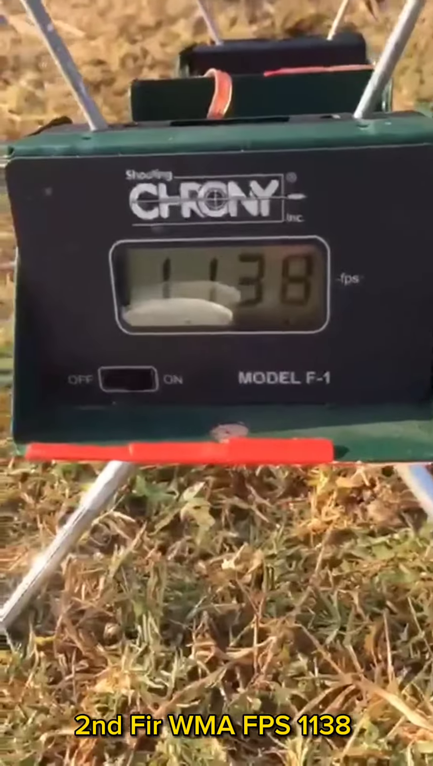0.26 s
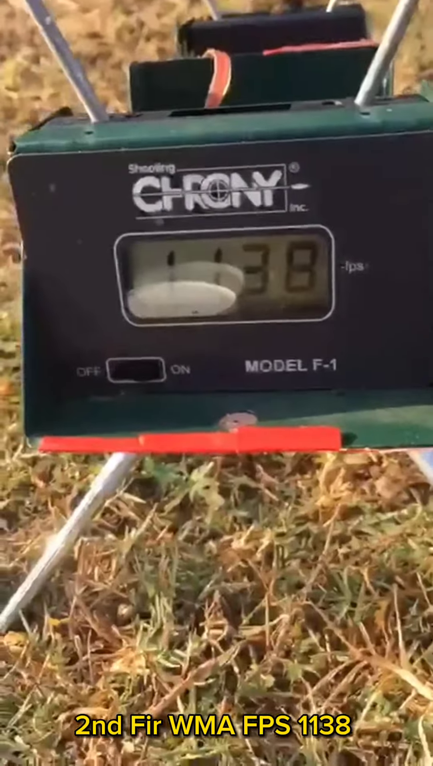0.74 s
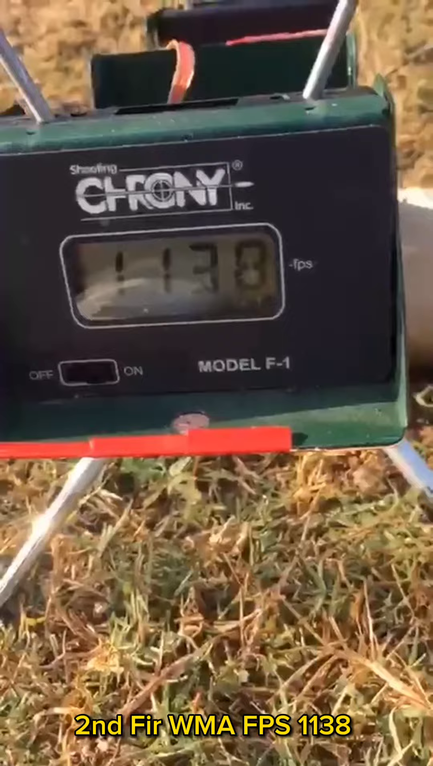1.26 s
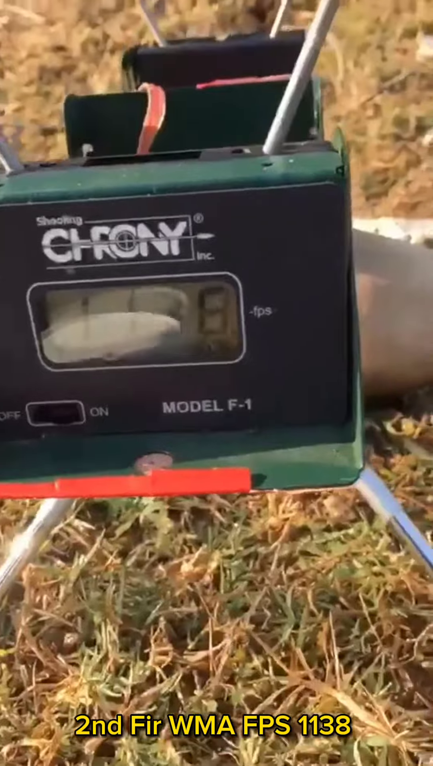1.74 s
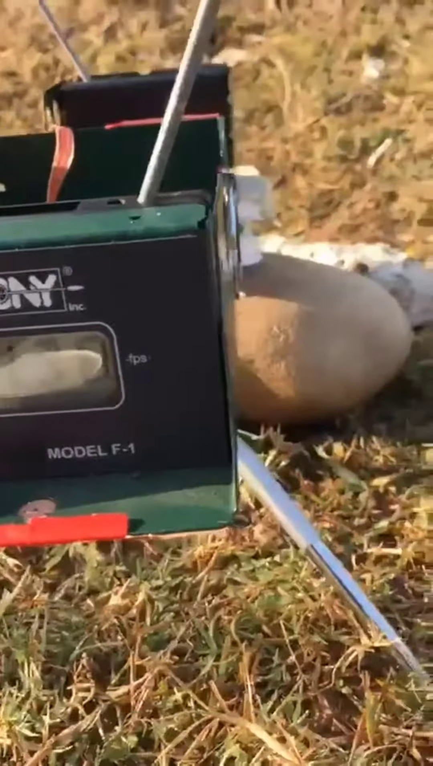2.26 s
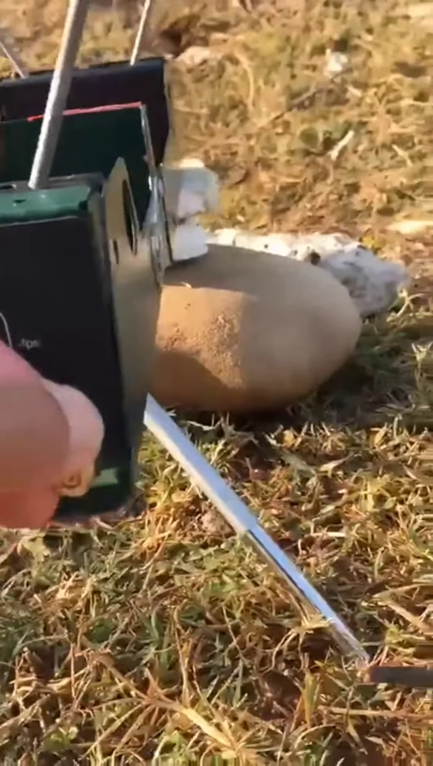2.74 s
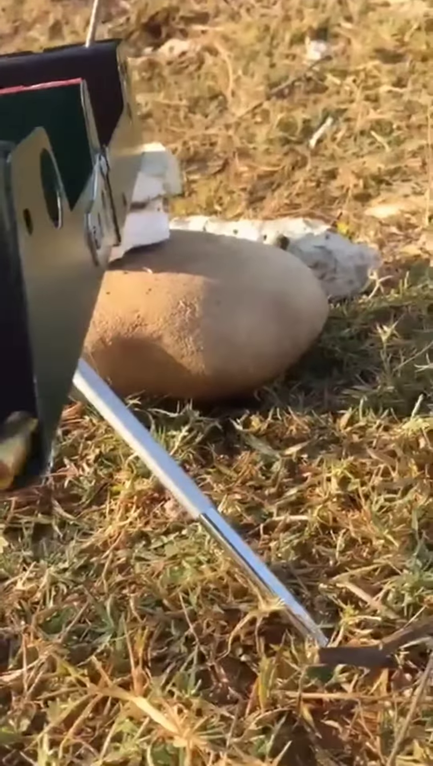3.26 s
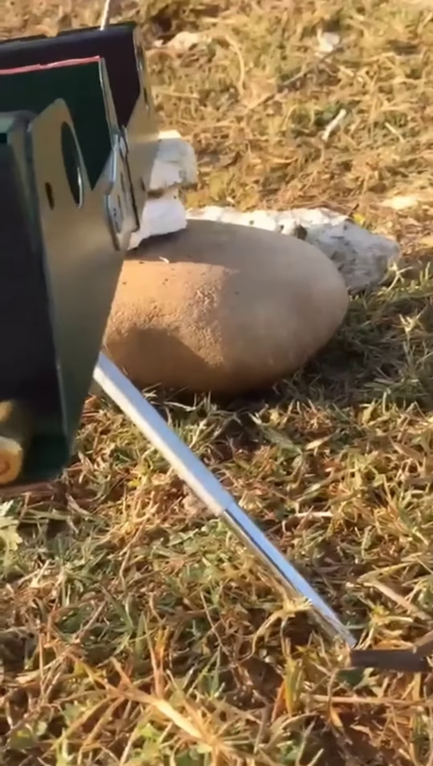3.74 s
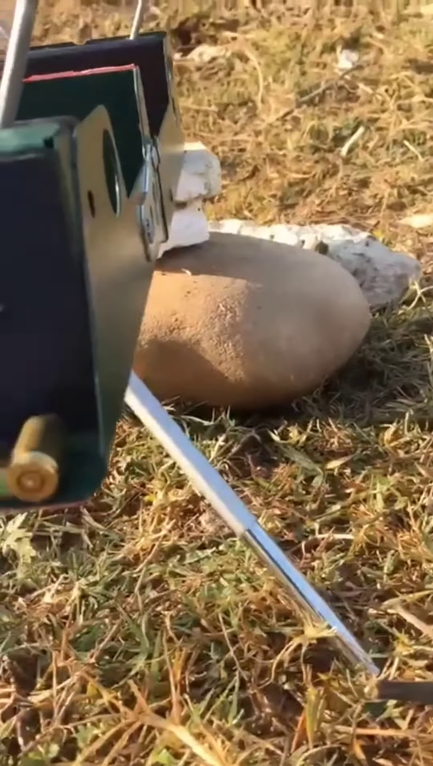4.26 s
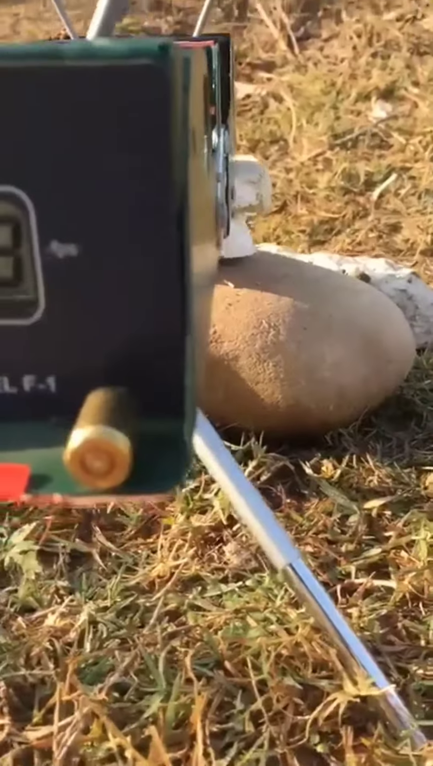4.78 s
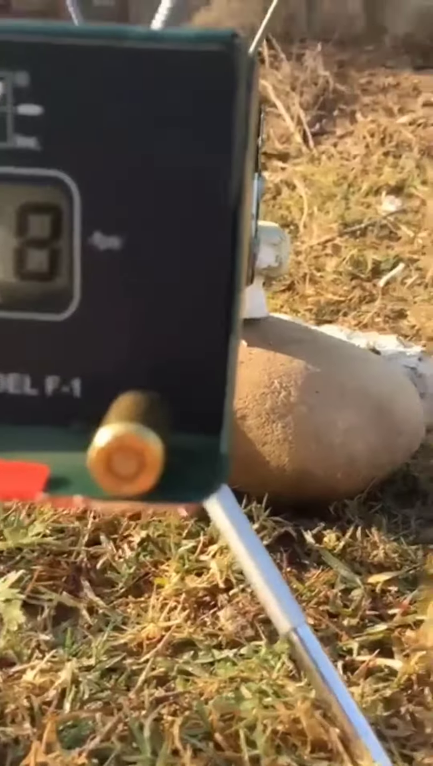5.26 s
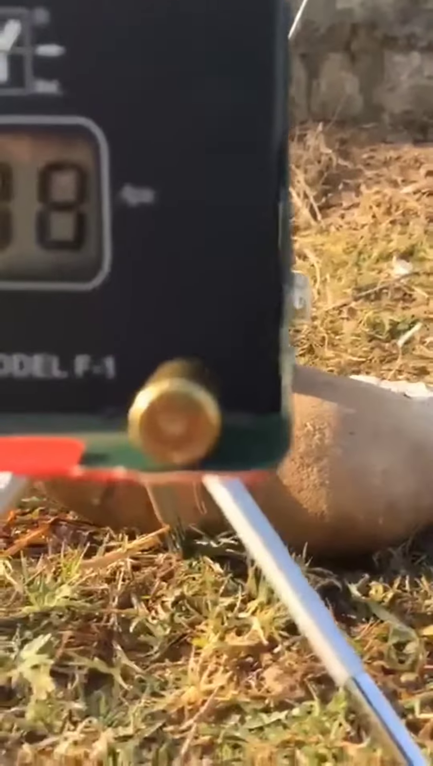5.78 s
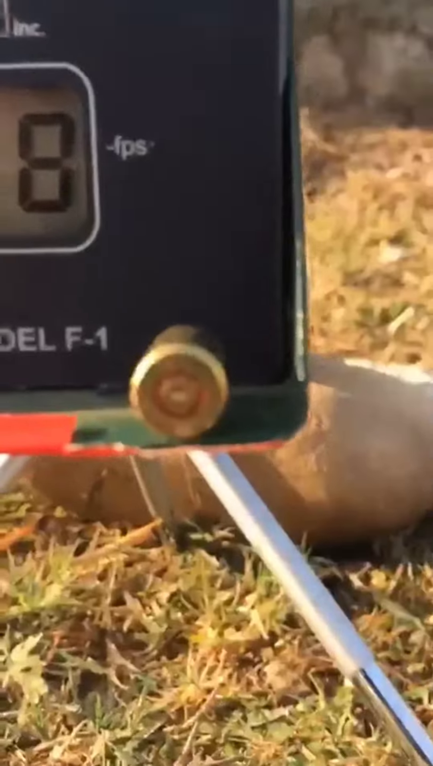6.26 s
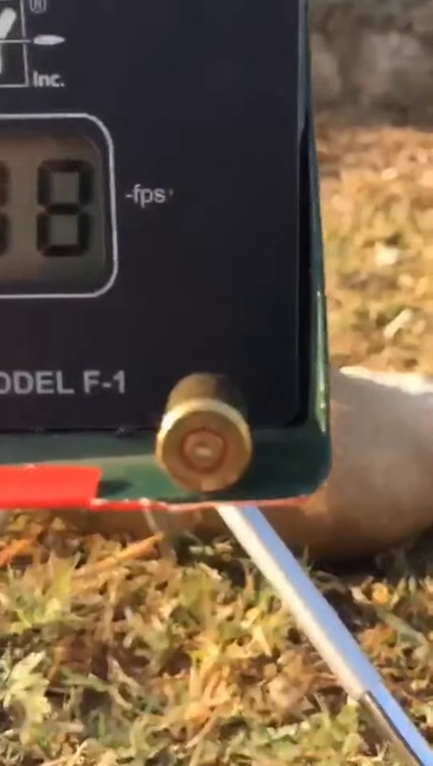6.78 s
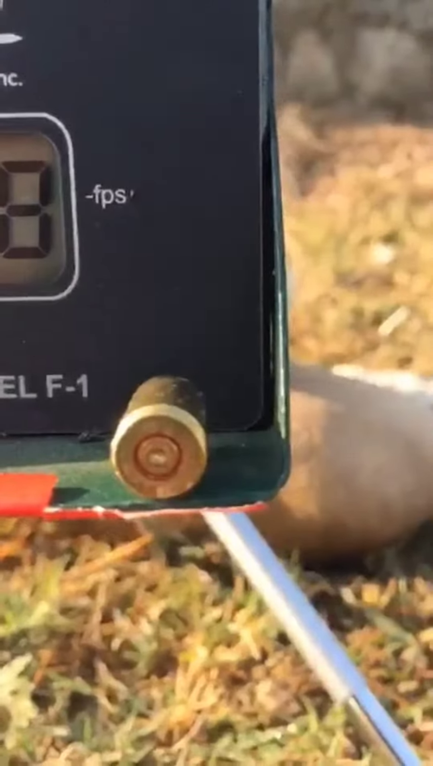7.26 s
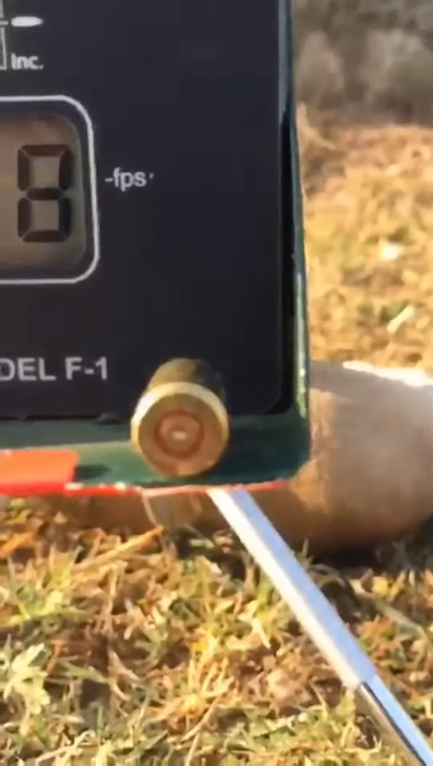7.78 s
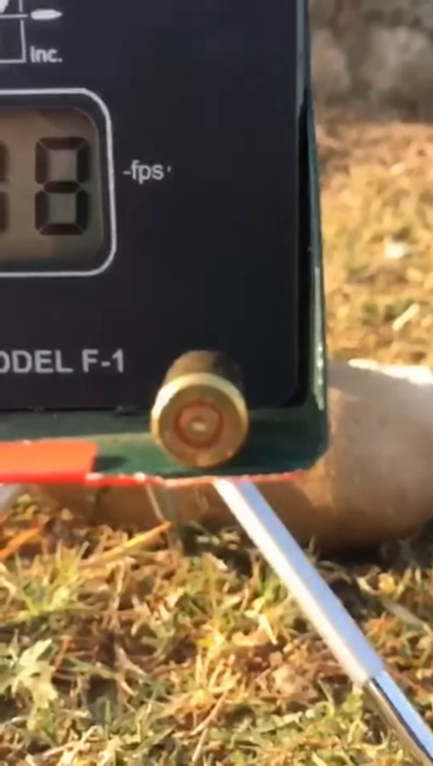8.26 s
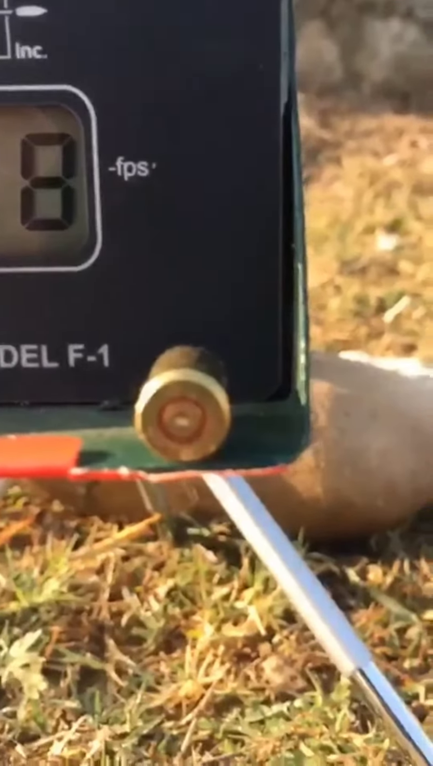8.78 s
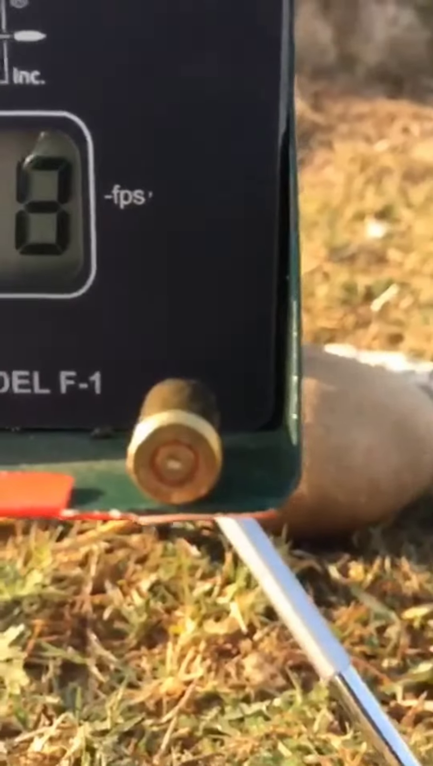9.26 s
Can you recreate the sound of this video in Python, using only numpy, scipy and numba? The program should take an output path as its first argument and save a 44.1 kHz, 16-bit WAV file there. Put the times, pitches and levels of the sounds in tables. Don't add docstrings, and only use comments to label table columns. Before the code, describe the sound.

A handheld phone microphone in an open field picks up quiet far traffic rumble and thin air hiss throughout. From 0 s crows caw near and far in short, nasal, rattling calls of roughly a third of a second, one of them hoarser; a soft finger knock opens the scene, and tiny high songbird whistles flicker until about 6 s. A bright metallic tap with a quick rebound lands near 1 s, a thin fingernail tick on brass at 1.3 s. At 2.8 to 2.9 s a brass shell hits a sheet-metal case, the second blow the loudest event, ringing briefly, with bounces at 3.3 s. Lighter taps follow near 4 s; soft knocks and a faint dry-grass brush come around 5.2 s. From 6.2 s a higher, clearer crow and answering neighbours overlap densely. A short tap and dull knocks arrive at 9 s as the cawing continues.

```python
import sys
import numpy as np
from scipy import signal
from scipy.fft import rfft, irfft
from scipy.io import wavfile
from scipy.ndimage import uniform_filter1d
from numba import njit

SR = 44100
rng = np.random.default_rng(int(sys.argv[2]) if len(sys.argv) > 2 else 0)


def elevation(decibels):
    levels = np.asarray(decibels, float)
    return 10 ** (levels / 20)


def to_wav(sig):
    pcm = np.clip(np.atleast_2d(sig), -1, 1) * 32767
    pcm = np.round(pcm).astype(np.int16)
    wavfile.write(sys.argv[1], SR, pcm.T)


N = 420273

# frequency in Hz, density in dB per Hz.
FIELD_SPECTRUM = [(24, -45.5), (40, 4), (149, -4), (461, -27), (600, -31), (800, -30.5), (1200, -40.5),
                  (2500, -42), (2900, -47), (4720, -49), (5580, -53), (11200, -59), (12300, -79),
                  (16000, -103), (22000, -120)]
# start in seconds, length in seconds, first and last pitch in Hz, level in dB.
WHISTLES = [(.062, .028, 4350, 4900, -64), (1.332, .011, 6500, 6500, -65), (1.374, .027, 4450, 4850, -68),
            (1.401, .014, 3800, 3700, -70), (2.325, .025, 4450, 4900, -65), (2.35, .03, 6100, 6150, -66),
            (3.046, .03, 4550, 4500, -67), (4.108, .055, 3620, 5000, -63), (4.157, .032, 5000, 4680, -60),
            (4.908, .034, 4050, 4900, -61), (4.941, .02, 5960, 5950, -59), (5.105, .018, 6450, 6450, -68),
            (5.64, .112, 3330, 3680, -75), (5.746, .056, 3680, 5050, -68), (5.797, .017, 5900, 5900, -72),
            (5.868, .024, 6350, 6450, -64), (5.884, .018, 5900, 5550, -62), (5.95, .03, 6400, 5600, -65)]
# start in
# seconds, peak in dB, centre in Hz, 60 dB decay in seconds.
KNOCKS = [(.006, -34.5, 1390, 0.051), (1.251, -46.5, 554, 0.052), (1.954, -47, 560, 0.075),
          (2.59, -43, 604, 0.055), (2.888, -50, 1783, .15), (.062, -48, 3040, 0.19),
          (4.806, -42.5, 540, 0.13), (5.134, -36.5, 990, 0.031), (5.372, -43, 1850, 0.29),
          (5.841, -41.5, 590, 0.045), (5.839, -49.5, 1040, 0.072), (6.389, -41.5, 654, 0.045),
          (9.003, -34, 570, 0.0056), (9.041, -34.5, 590, 0.023)]
# start in seconds, peak in dB, tilt in dB per octave,
# 60 dB decay of the crack in seconds, ring of the case in dB.
CASE_TAPS = [
    (0.9612, -15, -5, 0.007, -22),
    (0.9665, -20, -4, 0.007, -28),
    (3.806, -43, -11, .015, -30),
    (3.9617, -24, -4, 0.016, -20),
    (4.01, -36, -12, 0.05, -28),
    (5.134, -39, -13, .02, -30),
    (5.371, -40, -10, .018, -30),
    (9.0029, -22, -2, 0.006, -40),
]
SHELL_TAPS = [
    (2.8356, -18.5, -3, 0.034, -22),
    (2.9243, -3, 1, 0.034, -15),
    (3.3012, -22, -2, 0.026, -30),
    (3.337, -16, -3, 0.026, -30),
]
# frequency in Hz, density in dB per Hz.
CRACK_SPECTRUM = [(240, -52), (400, -39), (2230, -1), (3290, -16), (3960, -12.5), (6740, -15),
                  (7240, -21.5), (8720, -18.5), (12300, -23.5), (16000, -70), (22000, -120)]
# frequency in Hz, level in dB, 60 dB decay in seconds.
CASE_MODES = [(680, -12, .04), (1385, 0, .085), (2220, -2, .07), (2275, -23, .3), (2888, -25, .3),
              (3095, -25, .22), (3476, -24, .3), (3623, -27, .22), (3810, -27, .22), (4463, -22, .08),
              (6826, -30, .15)]
# frequency in Hz, level in dB, 60 dB decay in seconds.
BRASS_MODES = [(7630, -28, .1), (8545, -12, .11), (9600, -25, .06), (11080, -33, .25), (11640, -11, .16)]
# frequency in Hz, gain in dB.
THROAT = [(450, -50.5), (965, 2.5), (1400, -5), (1900, 4), (2400, -21), (2800, -20.5), (3600, -40.5),
          (12000, -56.5)]
# frequency in Hz, width in Hz, level in dB.
PIPE = [(3200, 1100, -7.5), (3913, 370, 1), (4265, 260, -1.5), (5450, 260, -5), (5845, 270, -0.5),
        (6760, 280, -8), (8110, 800, -15)]
# start in seconds, length in seconds, top pitch in Hz, level in dB,
# spread in dB of the partials around the 4th.
FAR_CROWS = [(.11, 0.27, 451.4, -49.5, 5), (.55, 0.33, 462.5, -50, 3), (1.39, 0.27, 468, -51.5, 9.5),
             (1.62, 0.19, 486, -44, -24), (2.52, 0.17, 474, -52, 9), (3.5, 0.28, 478, -53, 0),
             (4.06, 0.22, 463.5, -54.5, -0.5), (4.2, 0.4, 489, -46.5, 16.5), (4.64, 0.31, 498, -67.5, -4),
             (1.86, 0.23, 505, -74, -14), (0.0, 0.14, 482, -57, 8.5)]
STEADY_CROW = [(.3, 0.32, 454.5, -40.5, -6), (.76, 0.34, 466, -40, 4), (.815, 0.16, 460, -39, -25),
               (2.1, 0.255, 468.6, -32, 0), (2.58, 0.31, 461, -39, 4), (3.3, 0.26, 445.5, -39.5, 4),
               (3.81, 0.26, 450, -38.5, 3), (4.32, 0.3, 439, -41, -5), (4.825, 0.33, 453, -42, -4),
               (5.38, 0.27, 454, -42, 2.5), (5.93, 0.26, 464.7, -43.5, 6.5)]
ANSWERING_CROWS = [(6.45, 0.28, 466, -47, 6.5), (6.68, 0.3, 486.5, -40, 10), (7.08, 0.18, 454, -31.5, 0.5),
                   (7.2, 0.15, 430.4, -33.5, -4.5), (7.42, 0.31, 454.5, -35, -7),
                   (7.62, 0.24, 443, -34, -3.5), (7.95, .415, 465, -39.5, 9), (8.46, .25, 469.5, -38.5, -2),
                   (8.55, 0.29, 453.5, -45.5, -0.5), (9.08, 0.19, 449.3, -39, -3),
                   (9.2, 0.27, 444, -40.5, -2.5)]
HOARSE_CROW = [
    (.88, 0.29, 512, -37.5, 5.8),
    (1.45, 0.29, 510.6, -36.5, 1.4),
    (2.035, .315, 502, -38, 2.3),
    (3.105, 0.255, 485, -34.5, 4.6),
    (8.01, 0.28, 511.6, -31.5, 1.8),
]
HIGH_CROW = [
    (6.215, 0.33, 490.2, -35, -0.5),
    (6.81, 0.29, 493, -31, -1.5),
    (7.33, .3, 492.2, -33.5, 1),
    (8.825, 0.29, 494, -34, -1.5),
]

# rattle in Hz, then 2nd, 3rd and 5th partial and treble in dB.
VOICE_HIGH, VOICE_HOARSE = (75.5, -11.5, -1.5, 8, -15.5), (78, -14, -1.5, 5, -19.5)
VOICE_STEADY, VOICE_ANSWER = (77, -9.5, 0, 7, -20), (76, -7.5, 2, 8.5, -19.5)
VOICE_FAR = (77.5, -15, 2, -2.5, -26.5)
# hoarseness 0-1, top of effort as share of length, arch of pitch, attack in seconds.
MANNER_HIGH, MANNER_HOARSE = (.22, .28, .85, .016), (.44, .38, 1.2, .07)
MANNER_STEADY, MANNER_ANSWER = (.42, .31, 1.1, .06), (.34, .31, .95, .03)
MANNER_FAR = (.33, .4, 1.05, .036)


def colour(hz, points):
    f, db = np.transpose(points)
    return np.interp(np.log(np.maximum(hz, 1)), np.log(f), db)


def walk(size, rate_hz):
    k = max(int(SR / rate_hz), 1)
    w = uniform_filter1d(uniform_filter1d(rng.standard_normal(size), k), k)
    return w * np.sqrt(1.5 * k)


def band(x, hz, octaves):
    edges = np.clip([hz * 2 ** -octaves, hz * 2 ** octaves], 30, SR / 2.2)
    return signal.sosfilt(signal.butter(2, edges, "band", fs=SR, output="sos"), x)


@njit
def svf(x, hz, width):
    y, b, l = np.empty(len(x)), 0., 0.
    for i in range(len(x)):
        g, k = np.pi * hz[i] / SR, width / hz[i]
        g = np.tan(g)
        v = (b + g * (x[i] - l)) / (1 + g * (g + k))
        b, l, y[i] = 2 * v - b, l + 2 * g * v, k * v
    return y


def span(length, attack, release):
    t = np.arange(0, length, 1 / SR)
    return t / length, np.clip(np.minimum(t / attack, (length - t) / release), 0, 1)


def add(out, s, x):
    i = max(int(s * SR), 0)
    out[i:i + len(x)] += x[:N - i]


def field():
    level_db = -40
    hz = np.arange(N // 2 + 1) * SR / N
    spectrum = rfft(rng.standard_normal(N)) * elevation(colour(hz, FIELD_SPECTRUM))
    octave = np.clip(np.log2(np.maximum(hz, 1) / 40), 0, 8)
    out = 0
    for k in range(9):
        share = np.clip(1 - np.abs(octave - k), 0, 1)
        drift_db = 0.092 * walk(N, 3.8) + 2.76 * walk(N, 27)
        out = out + irfft(spectrum * share, N) * elevation(drift_db)
    return out * elevation(level_db) / np.sqrt(np.mean(out ** 2))


def songbird():
    out = np.zeros(N)
    for s, length, first_hz, last_hz, db in WHISTLES:
        u, fade = span(length, .007, .006)
        pitch = first_hz + (last_hz - first_hz) * u ** .9
        waver = 1 + .005 * walk(N // 20, 150)[:len(pitch)]
        phase = 2 * np.pi * np.cumsum(pitch * waver) / SR
        flicker_db = 4.5 * walk(N // 20, 110)[:len(u)]
        add(out, s, fade * elevation(db - 1.5 + flicker_db) * np.sin(phase))
    return out


def grass(out):
    start_s, length_s, fade_s, level_db = 5.15, .22, .07, -55.5
    u, fade = span(length_s, fade_s, fade_s)
    stalks = band(rng.standard_normal(len(u)), 1680, 0.47) * 3
    add(out, start_s, fade * elevation(level_db + 2.4 * walk(len(u), 76)) * stalks)


def burst(t, hz, octaves, t60):
    x = rng.standard_normal(len(t)) * elevation(-60 * t / t60) * np.minimum(t / 0.00038, 1)
    x = band(band(x, hz, octaves), hz, octaves)
    return x / np.abs(x).max()


def knocks_and_scrapes(out, t):
    for s, db, hz, t60 in KNOCKS:
        add(out, s, elevation(db) * burst(t, hz, .45, t60))


def crack(t, tilt_db, t60, rise, tail_db=-37):
    hz = np.arange(len(t) // 2 + 1) * SR / len(t)
    gain_db = colour(hz, CRACK_SPECTRUM) + tilt_db * np.log2(hz / 2500 + 0.044)
    noise = irfft(rfft(rng.standard_normal(len(t))) * elevation(gain_db), len(t))
    decay = elevation(-60 * t / t60)
    noise = noise - band(noise, 8000, 1) * (1 - decay)
    tail = elevation(tail_db - 60 * t / .25)
    x = noise * np.minimum(t / rise, 1) ** 2 * (decay + tail)
    return x / np.abs(x).max()


def ring(t, modes):
    out = 0
    for (hz, db, t60), (a, b, c) in zip(modes, rng.standard_normal((len(modes), 3))):
        pair = np.sin(2 * np.pi * hz * (1 + .002 * b) * t)
        pair = pair + .3 * np.sin(2 * np.pi * hz * (1.012 + .004 * c) * t)
        out = out + elevation(db + 2 * a - 60 * t / t60) * pair
    return out * np.minimum(t / 0.00083, 1)


def fingernail_tick(out, t):
    start_s, peak_db, tilt_db, t60, rise_s = 1.2922, -23, 15, .02, .0002
    rim = [(7750, -38, .016), (11590, -39, .03)]  # Hz, dB, 60 dB decay in seconds
    add(out, start_s, elevation(peak_db) * crack(t, tilt_db, t60, rise_s, -57) + ring(t, rim))


def metal_taps(out, t):
    for taps, rise_s in ((CASE_TAPS, .0007), (SHELL_TAPS, .0026)):
        for s, db, tilt_db, t60, case_db in taps:
            blow = crack(t, tilt_db, t60, rise_s) + elevation(case_db) * ring(t, CASE_MODES)
            add(out, s, elevation(db) * blow)
    for s, db, *_ in SHELL_TAPS:
        add(out, s, elevation(1.4 * db - 23) * ring(t, BRASS_MODES))


def handling():
    out, t = np.zeros(N), np.arange(SR // 4) / SR
    grass(out)
    knocks_and_scrapes(out, t)
    fingernail_tick(out, t)
    metal_taps(out, t)
    return out


def effort(length, top_hz, db, top_share, arch, attack):
    u, fade = span(length, attack, .018)
    before = np.clip(1 - u / top_share, 0, 1)
    after = np.clip((u - top_share) / (1 - top_share), 0, 1)
    climb, sag, drop = before ** 2, after ** 1.4, after ** 3.5
    wander = .01 * walk(N // 20, 14.52)[:len(u)]
    pitch = top_hz * (1 - arch * (.15 * climb + .07 * sag + .11 * drop) + wander)
    return pitch, fade * elevation(db - 8 * arch * climb - 3 * sag - 6 * drop)


def windpipe(x, size_ratio, hoarse):
    out = elevation(30 * hoarse - 24) * band(x, 4500, .5)
    climb = .085 * (np.linspace(0, 1, len(x)) - .5)
    for (hz, width, db), (a, b) in zip(PIPE, rng.standard_normal((len(PIPE), 2))):
        centre = hz * size_ratio * (1 + .014 * a + climb * (hz < 5000))
        turn_db = 2.0 * b + 3.5 * walk(N // 20, 12)[:len(x)]
        rung = svf(svf(x, centre, 1. * width), centre, 2. * width)
        out = out + elevation(db + turn_db) * rung
    return out / np.sqrt(np.mean(out ** 2))


def caw(pitch, rattle_hz, second_db, third_db, fifth_db, treble_db, hoarse):
    size = len(pitch)
    chance = np.clip([walk(N // 20, r)[:size] for r in (25, 250)], -2, 2)
    rattle = 2 * np.pi * np.cumsum(rattle_hz * (1 + 0.204 * hoarse * chance[0])) / SR
    rattle = rattle + rng.uniform(0, 2 * np.pi)
    hz = pitch * (1 + .049 * np.sin(rattle) + .09 * hoarse ** 1.7 * chance[1])
    k = np.arange(1, 22)[:, None]
    partials = np.sin(k * 2 * np.pi * np.cumsum(hz) / SR + rng.uniform(0, 2 * np.pi, k.shape))
    beak = (pitch / 480) ** .5
    db = colour(k * hz / np.sqrt(beak), THROAT)
    db = db + second_db * (k == 2) + third_db * (k == 3) + fifth_db * (k == 5)
    slow, quick = (np.array([walk(N // 20, r)[:size] for _ in range(7)])[k[:, 0] % 7] for r in (18, 220))
    patch_db = 2.8 * slow + 6.5 * hoarse * np.clip(quick, -2, 2)
    patch_db = patch_db - 50 * (1 - pitch / pitch.max()) * np.abs(slow)
    throb_db = 3.0 * np.cos(rattle - .8)
    low = np.sum(elevation(db + patch_db) * partials, axis=0) * elevation(throb_db)
    low = low * (1 + .13 * np.cos(np.pi * np.cumsum(hz) / SR))
    high = np.sum((elevation(patch_db) * partials)[6:], axis=0) * elevation(1.2 * throb_db)
    high = high * beak ** 5
    treble = windpipe(high, (pitch.max() / 495) ** .55, hoarse)
    voice = low / np.sqrt(np.mean(low ** 2)) + elevation(treble_db - 2.5) * treble
    dip_hz = 2950 * beak * (1 + .035 * chance[0, 0])
    return voice - .95 * svf(voice, dip_hz, 520.)


def scatter_back(x):
    t = np.arange(SR // 3) / SR
    decay = elevation(-60 * t / .3) + 3 * elevation(-60 * t / .06)
    scatter = rng.standard_normal(len(t)) * decay * (t > .004)
    return elevation(-41) * signal.fftconvolve(x, scatter)[:N]


def crows():
    out = np.zeros(N)
    flock = ((FAR_CROWS, VOICE_FAR, MANNER_FAR), (STEADY_CROW, VOICE_STEADY, MANNER_STEADY),
             (ANSWERING_CROWS, VOICE_ANSWER, MANNER_ANSWER), (HOARSE_CROW, VOICE_HOARSE, MANNER_HOARSE),
             (HIGH_CROW, VOICE_HIGH, MANNER_HIGH))
    for caws, (rattle_hz, second, third, fifth, treble), (hoarse, *shape) in flock:
        for s, length, top_hz, db, spread in caws:
            pitch, gain = effort(length, top_hz, db, *shape)
            rattle = rattle_hz * (1 + .02 * rng.standard_normal())
            voice = caw(pitch, rattle, second + spread / 2, third + spread, fifth + spread,
                        treble + spread / 2, hoarse)
            add(out, s, gain * voice)
    return out + scatter_back(out)


def scene():
    return (field() + songbird() + handling() + crows())[None]


def low_pass(x):
    return signal.sosfilt(signal.butter(12, 12450, fs=SR, output="sos"), x)


def record(dry):
    x = signal.sosfilt(signal.butter(4, 50, "high", fs=SR, output="sos"), dry)
    x = signal.sosfilt(signal.ellip(10, .2, 60, 12000, fs=SR, output="sos"), x)
    return low_pass(x)


dry = scene()
out = record(dry)
to_wav(out)
```